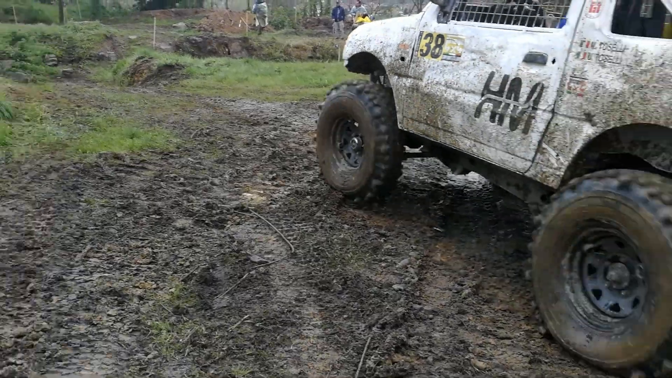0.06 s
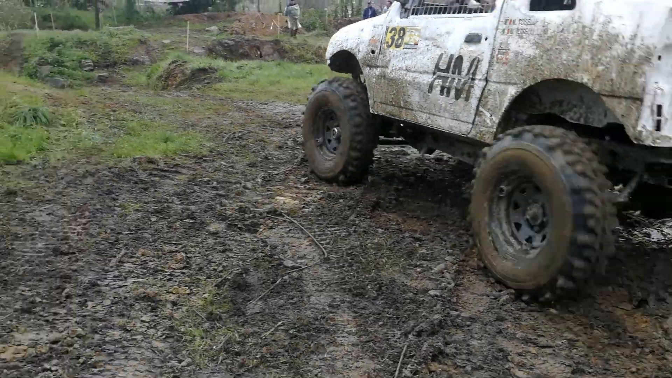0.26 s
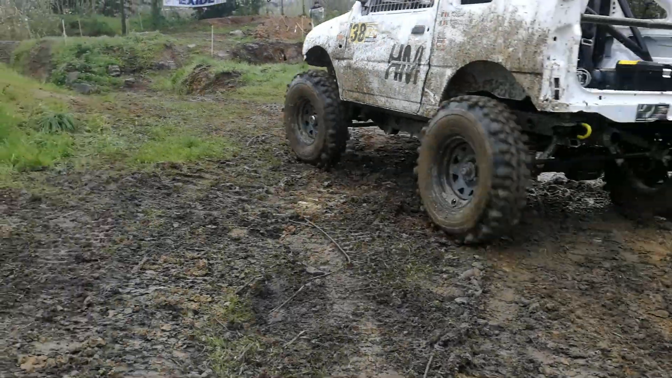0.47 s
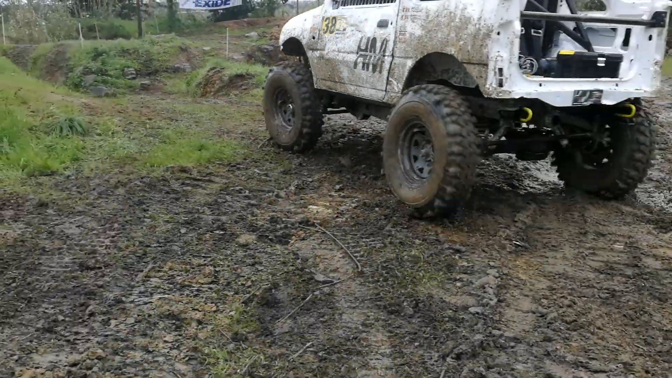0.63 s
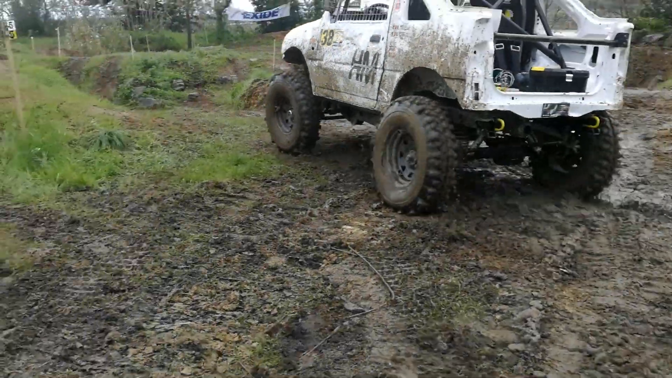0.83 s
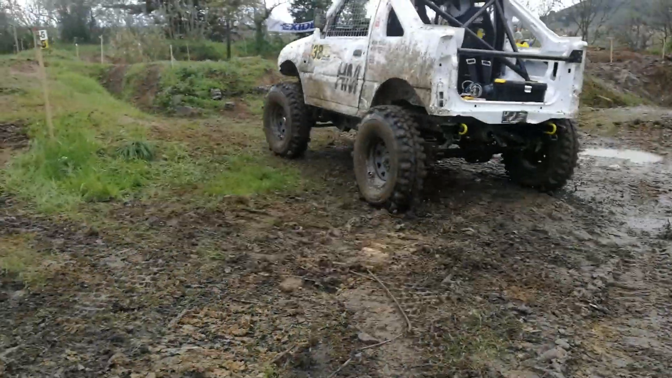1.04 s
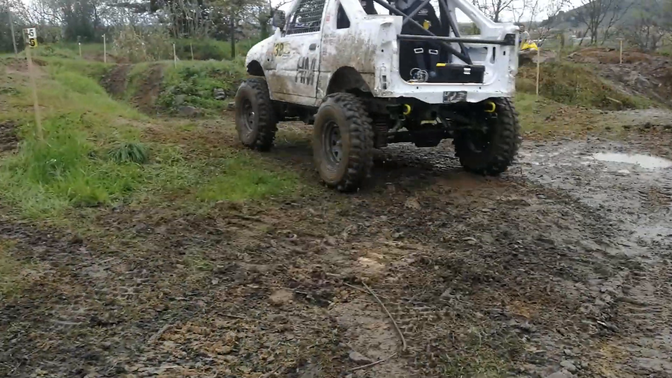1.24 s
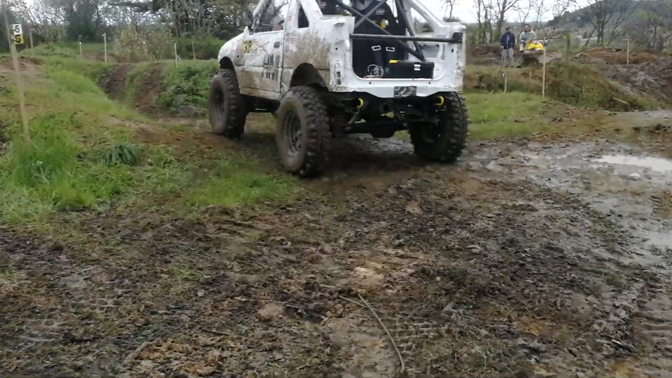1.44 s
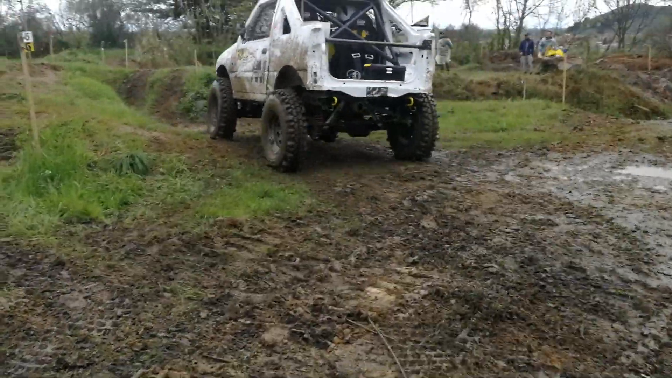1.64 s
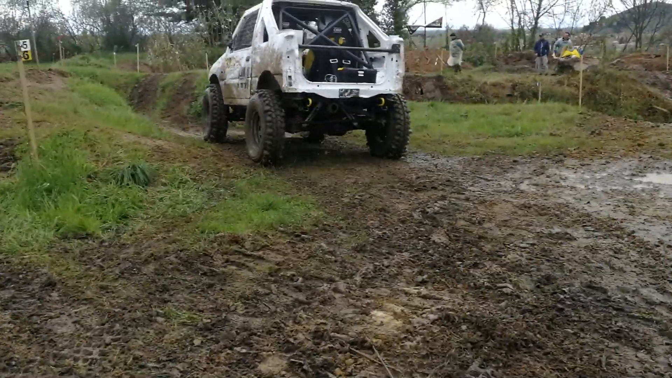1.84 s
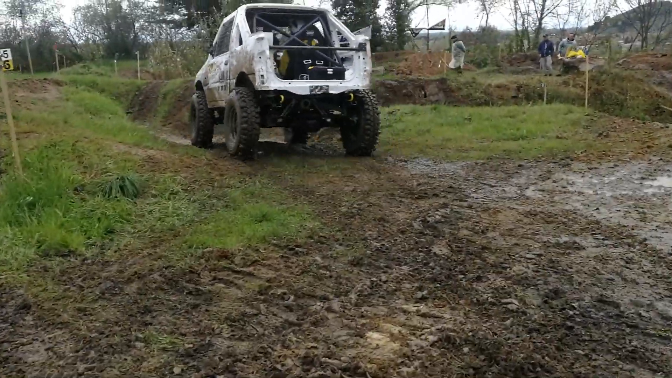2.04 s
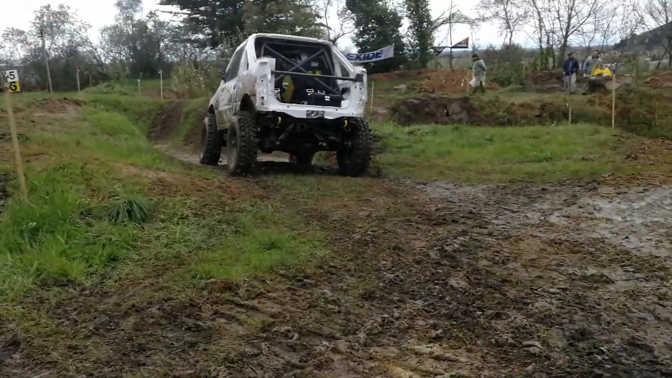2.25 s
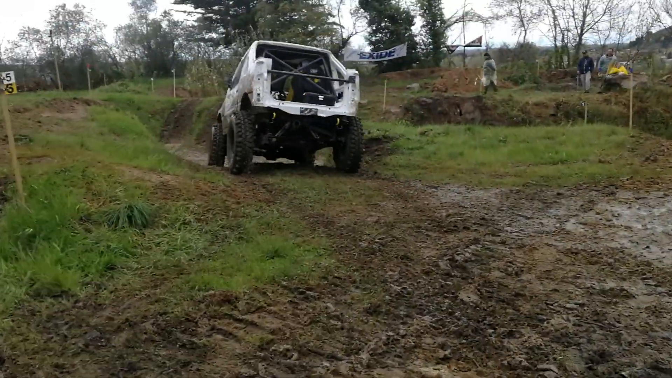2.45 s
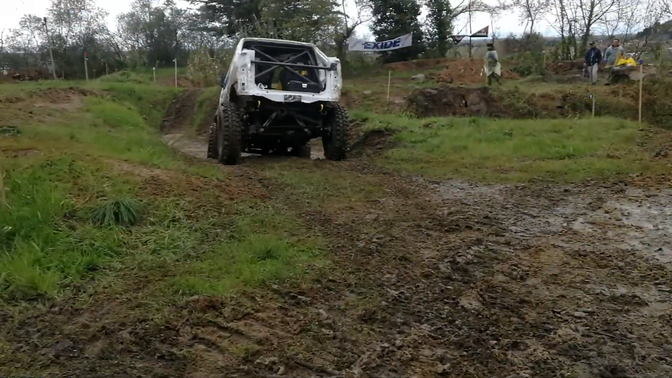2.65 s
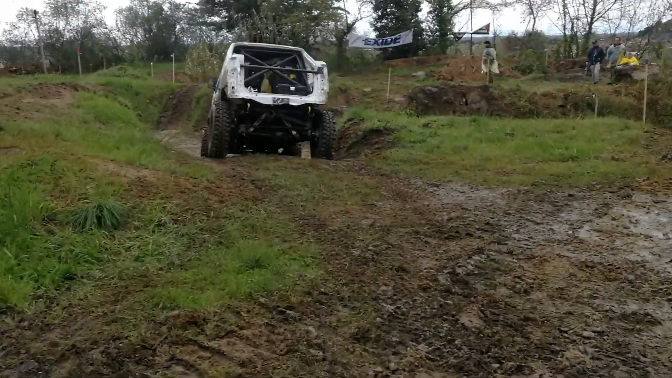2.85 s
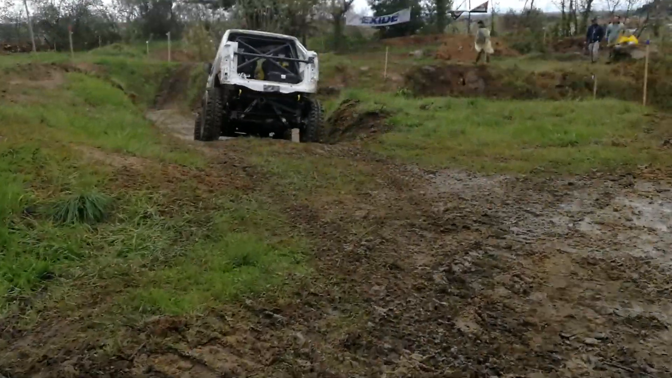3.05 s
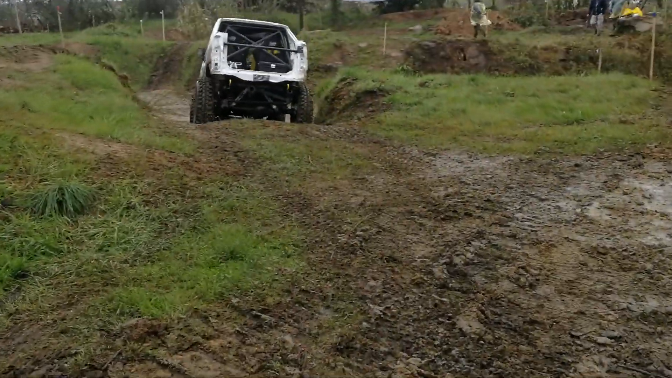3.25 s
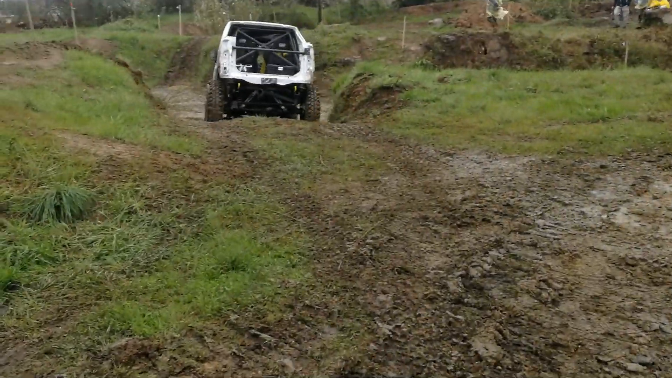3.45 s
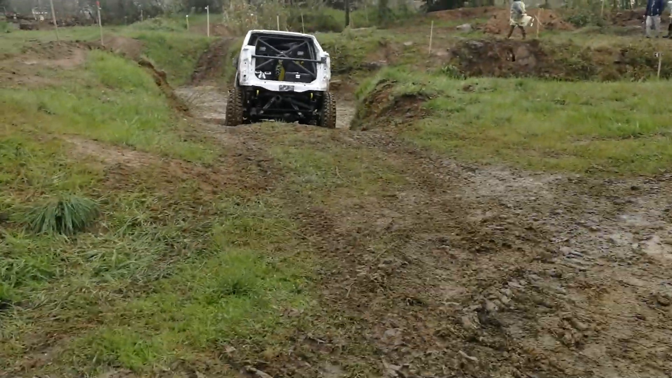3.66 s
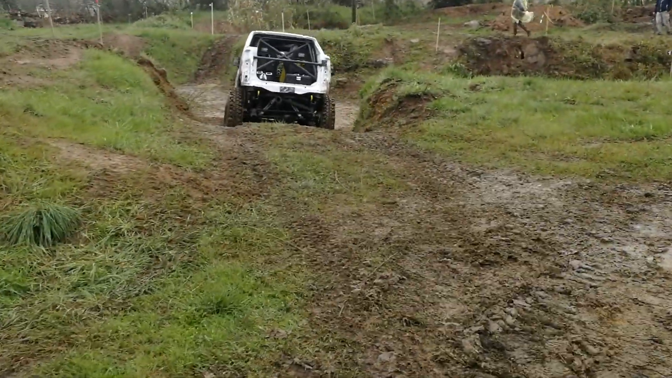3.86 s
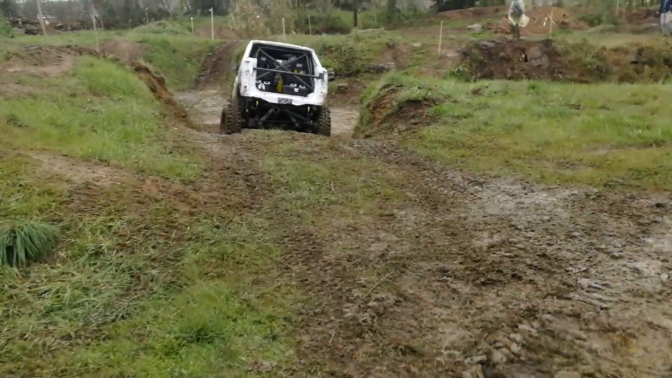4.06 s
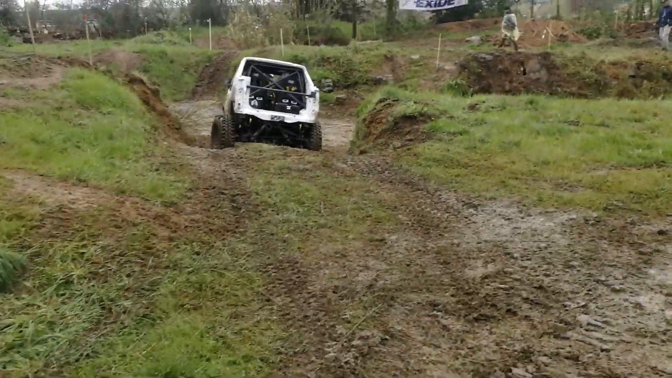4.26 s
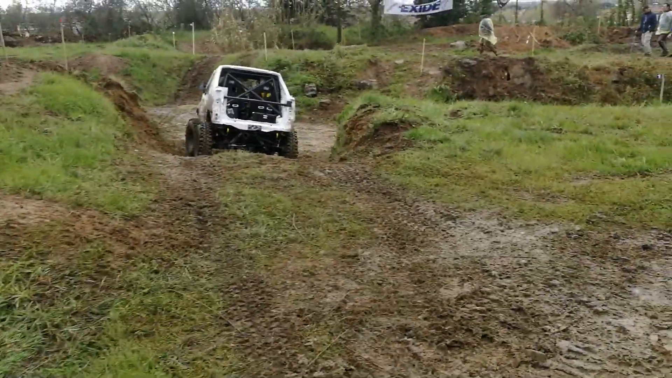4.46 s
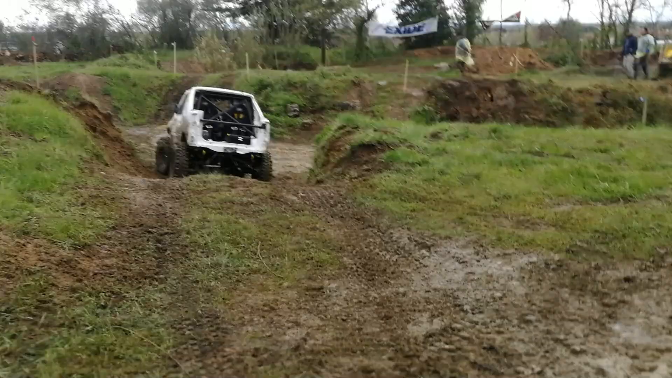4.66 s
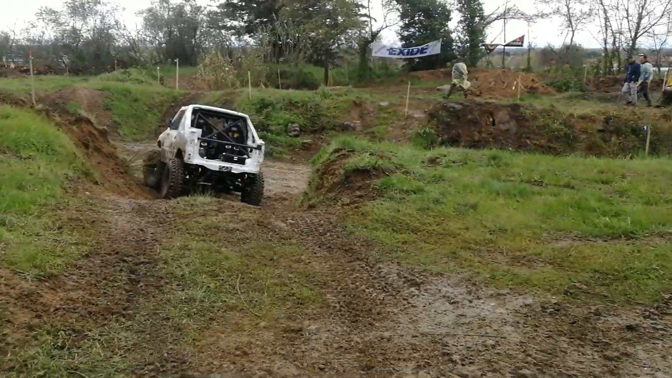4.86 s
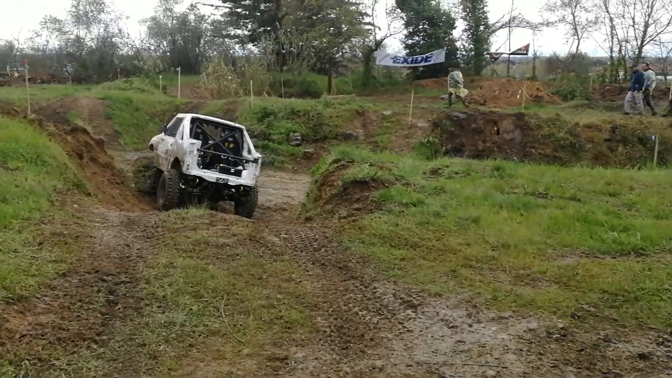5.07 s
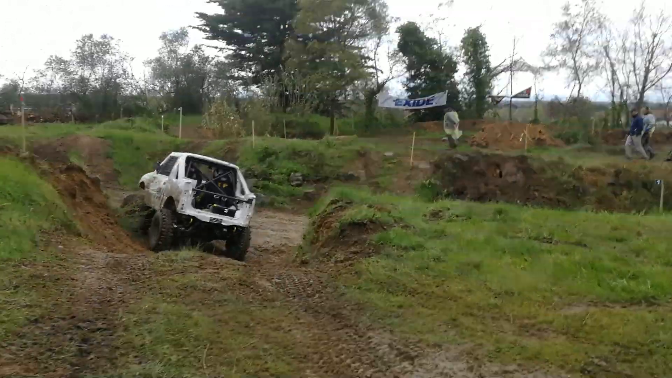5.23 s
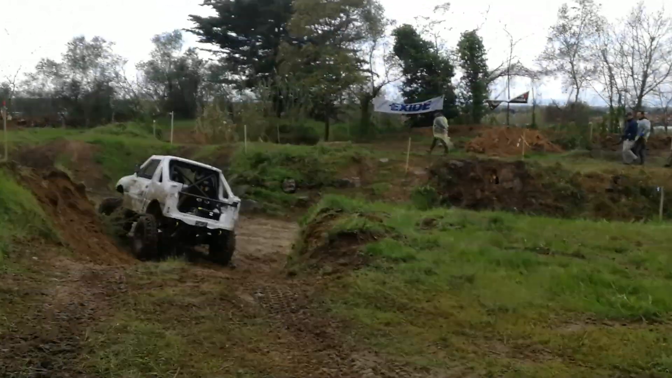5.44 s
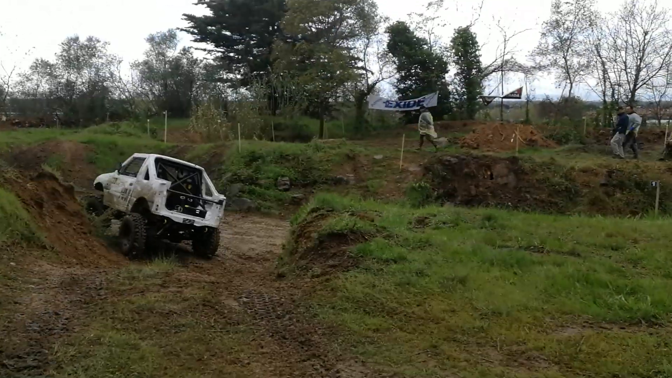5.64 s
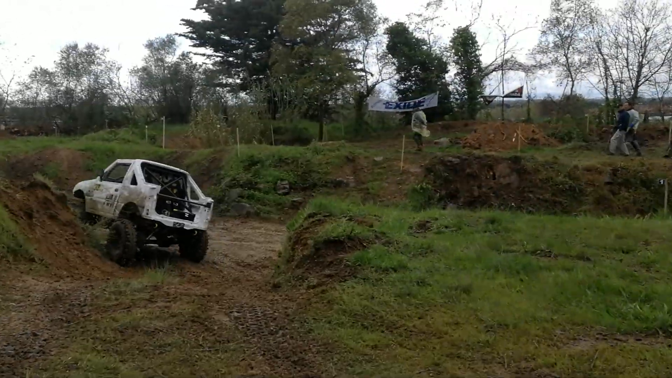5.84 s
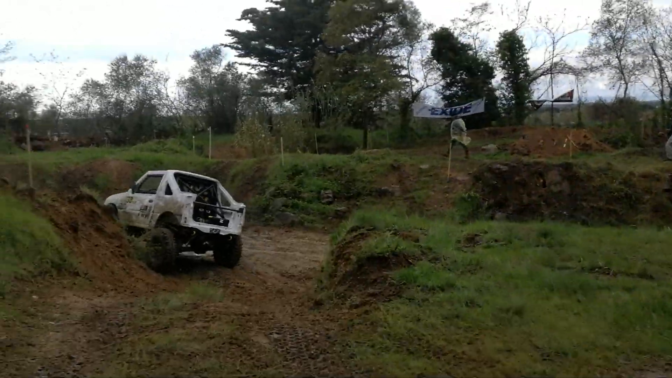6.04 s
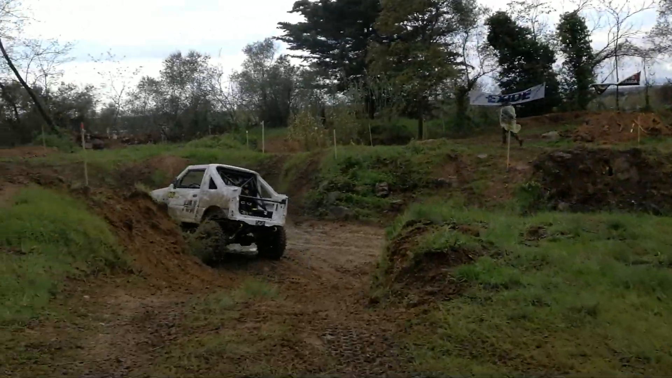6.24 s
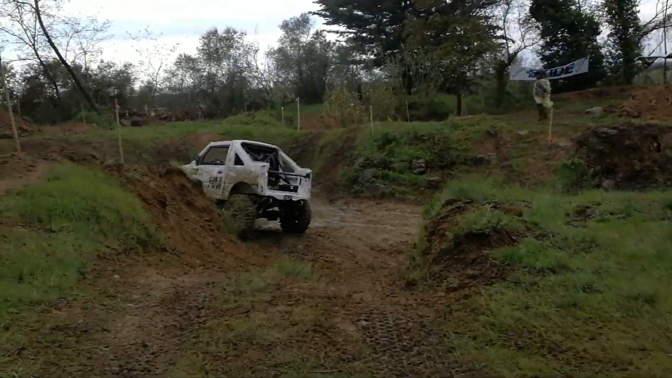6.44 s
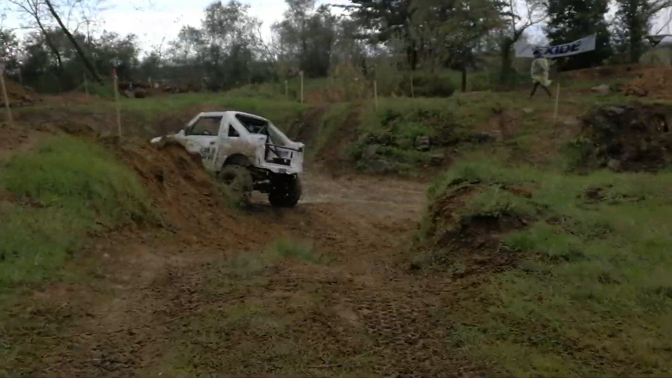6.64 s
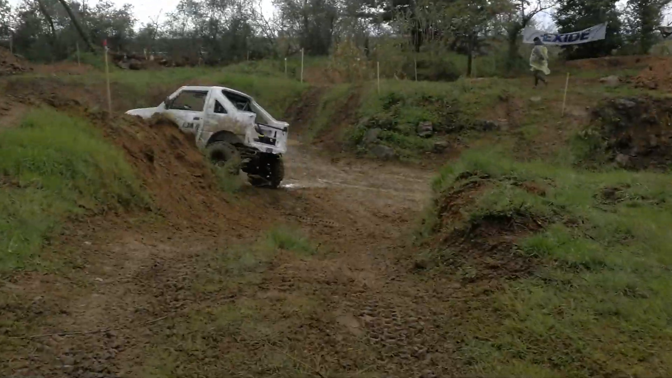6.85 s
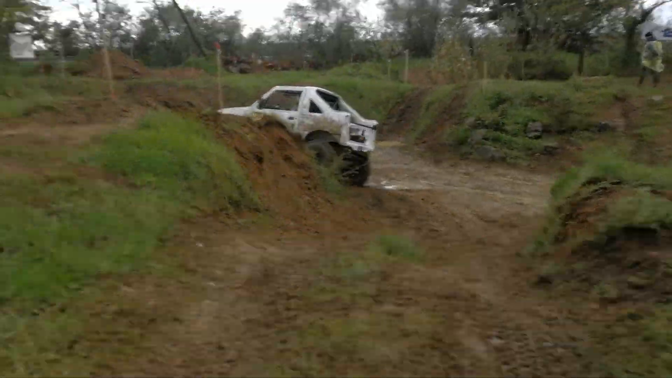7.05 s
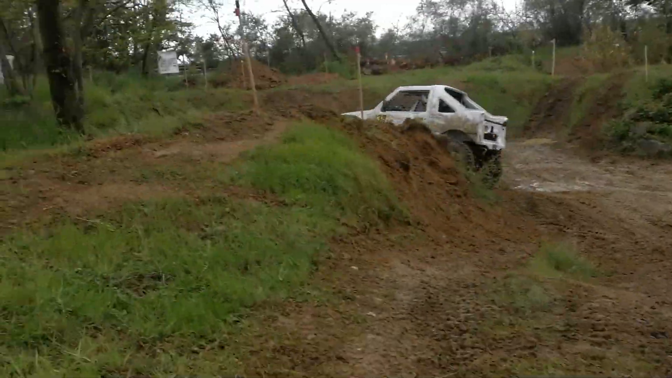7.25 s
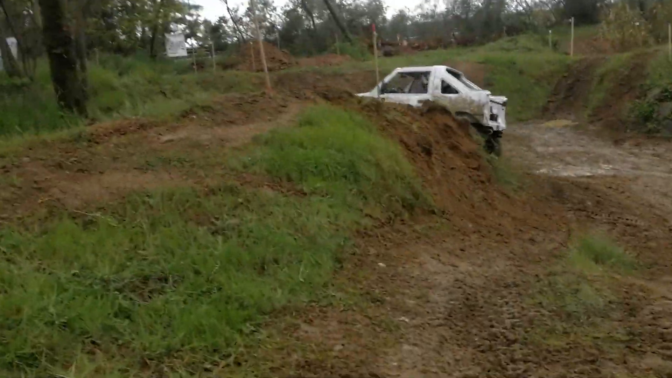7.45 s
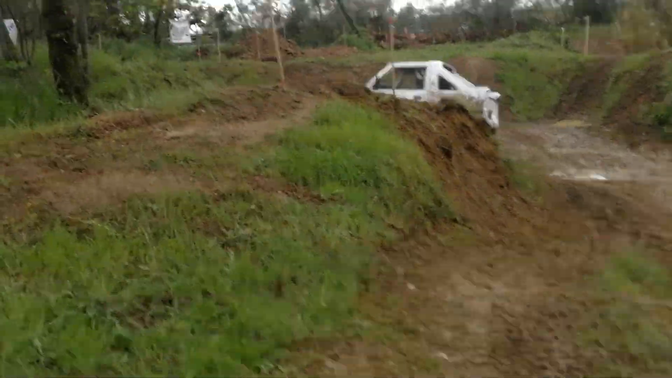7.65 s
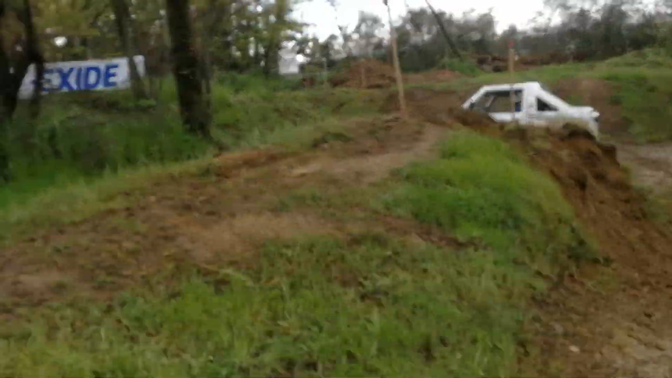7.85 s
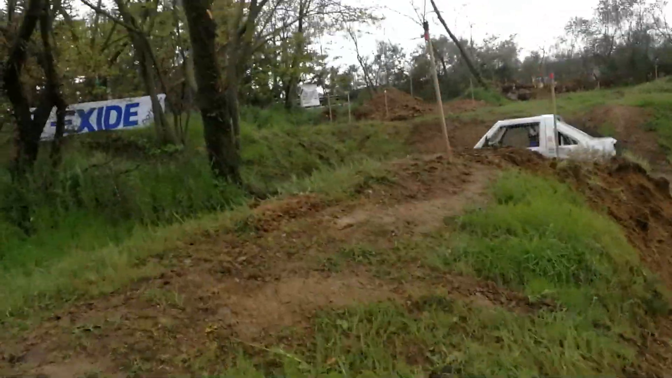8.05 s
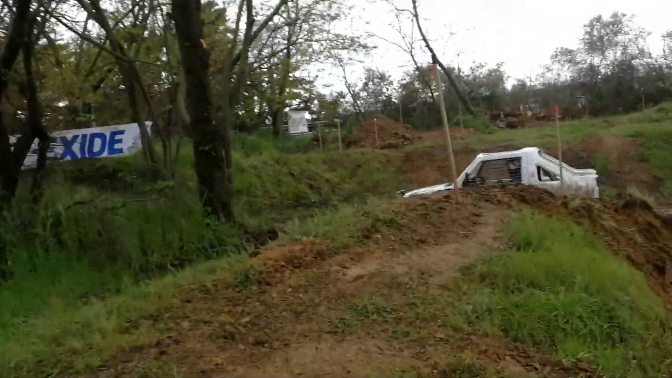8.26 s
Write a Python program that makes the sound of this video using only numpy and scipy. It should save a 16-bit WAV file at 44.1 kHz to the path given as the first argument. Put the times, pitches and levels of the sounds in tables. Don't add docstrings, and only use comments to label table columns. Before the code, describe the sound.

Raw exhaust growl of a muddy off-roader pulling away outdoors, sharp backfires on lift-off, low lugging, then a hard rasping burst sinking toward idle.

```python
import sys
import numpy as np
from scipy import signal
from scipy.fft import rfft, irfft, next_fast_len
from scipy.io import wavfile
from scipy.ndimage import uniform_filter1d, map_coordinates

SR = 44100
rng = np.random.default_rng(int(sys.argv[2]) if len(sys.argv) > 2 else 0)


def field_ratio(decibels):
    return 10 ** (np.asarray(decibels, dtype=float) / 20)


def unload_audio(sound):
    columns = np.transpose(np.atleast_2d(sound))
    steps = np.round(np.clip(columns, -1, 1) * 32767)
    wavfile.write(sys.argv[1], SR, steps.astype(np.int16))


N = 366030
STEP = 64


def unit(x):
    return x / np.sqrt(np.mean(x ** 2) + 1e-20)


def along(points, hz):
    f, v = np.transpose(points)
    return np.interp(np.log(hz + 1), np.log(f + 1), v)


def curves(rows):
    s, *cols = np.transpose(rows)
    return [np.interp(np.arange(N) / SR, s, c) for c in cols]


def fine(x):
    return np.interp(np.arange(N), np.arange(len(x)) * STEP, x)


def wobble(rate):
    knots = rng.standard_normal(int(N * rate / SR) + 4)
    return map_coordinates(knots, [np.arange(N) * rate / SR])


def filtered(x, response):
    m = next_fast_len(x.shape[-1] + 8192)
    spectrum = rfft(x, m) * response(np.fft.rfftfreq(m, 1 / SR))
    return irfft(spectrum, m)[..., :x.shape[-1]]


def below(hz, top_hz):
    return 1 / (1 + (hz / top_hz) ** 10)


def bell(hz, centre_hz, width_hz, power):
    return 1 / (1 + (2 * (hz - centre_hz) / width_hz) ** power)


# pitch_hz, likeness (0-1)
AIR_LIKENESS = [(200, 0.97), (640, 0), (1400, 0), (3000, 0.035), (8000, 0)]


def rush(spectrum, patchy_db, alike=AIR_LIKENESS):
    z = signal.stft(rng.standard_normal((2, N)), nperseg=512)[2]
    patches = uniform_filter1d(rng.standard_normal(z.shape[1:]), size=8, axis=0)
    patches = unit(uniform_filter1d(patches, size=10, axis=1))
    pair = signal.istft(z * field_ratio(patchy_db * patches), nperseg=512)[1][:, :N]

    def mid_side(hz):
        turn = np.arccos(np.clip(along(alike, hz), -1, 1)) / 2
        return field_ratio(along(spectrum, hz)) * [np.cos(turn), np.sin(turn)]

    mid, side = filtered(pair, mid_side)
    return unit(np.array([mid + side, mid - side]))


def add(track, sound, s, pan_db):
    part = track[:, round(s * SR):][:, :sound.shape[-1]]
    part += (sound * field_ratio([[pan_db / 2], [-pan_db / 2]]))[:, :part.shape[1]]


# pitch_hz, level_db (per Hz)
RUMBLE_COLOUR = [(12, -48), (20, -27.5), (101, 10.5), (155, -12.5), (212, 5.5), (349, 9.5), (433, -37),
                 (600, -16), (780, -49), (1320, -120)]
# time_s, level_db
RUMBLE_LEVEL = [(0, -43), (3.7, -40.5), (7.6, -44), (8.0, -47), (8.3, -52)]


def distant_engines():
    level_db = curves(RUMBLE_LEVEL)[0] + 1.5 * wobble(3.48)
    return field_ratio(level_db) * rush(RUMBLE_COLOUR, patchy_db=3)


# pitch_hz, level_db (per Hz)
FIELD_COLOUR = [(240, -47.5), (400, 4.5), (479, -12.5), (549, -10.5), (821, -9.5), (1450, -17.5),
                (1650, -16.5), (2100, -14.5), (5000, -24.5), (6500, -63), (11000, -120)]
# time_s, level_db
FIELD_LEVEL = [(3.6, -47), (4.5, -46.5), (5.1, -45), (5.9, -49), (7.2, -43.5)]


def open_field():
    level_db = curves(FIELD_LEVEL)[0] + 0.43 * wobble(1.3)
    return field_ratio(level_db) * rush(FIELD_COLOUR, patchy_db=3.0)


# time_s, gain_db
GUST_SWELL = [(6.1, 1), (7.2, -2), (7.55, 4.5), (7.9, 1.5), (8.05, 2.5)]


def gust():
    rise = np.clip((np.arange(N) / SR - 6.1) / .15, 0, 1)
    level_db = -41 + curves(GUST_SWELL)[0] + 2.5 * wobble(5.3)
    colour = [(15, -16), (35, 4.5), (70, -9), (120, -3), (200, -57.5)]
    return rise * field_ratio(level_db) * rush(colour, patchy_db=2.0)


# pitch_hz, level_db (per Hz)
GRASS_COLOUR = [(530, -31), (900, -16.5), (1370, -3), (1720, -5.5), (4860, -9), (7770, -6.5),
                (16000, -23.5)]
# start_s, length_s, level_db
RUSTLES = [(2.606, 0.33, -43), (3.1, 0.037, -70), (4.094, 0.054, -51), (4.171, 0.1, -53.5),
           (4.8, 0.089, -46.5), (5.828, 0.076, -45.5), (6.91, 0.17, -48.5), (7.125, 0.074, -48.5),
           (7.191, 0.14, -43.5), (7.3, 0.38, -55.5), (7.538, 0.16, -44.5), (7.636, 0.17, -46),
           (7.868, 0.23, -45.5)]


def rustles():
    track = np.zeros((2, N))
    brushing = rush(GRASS_COLOUR, patchy_db=1.5) * field_ratio(3.0 * wobble(150))
    for s, length, db in RUSTLES:
        swell = np.hanning(round(length * SR))
        add(track, field_ratio(db) * swell * brushing[:, round(s * SR):][:, :len(swell)], s, -2)
    return track


# start_s, level_db (peak), pitch_hz, pan_db (left over right)
CHIRPS = [(2.473, -33.5, 12000, -6), (2.5373, -37.5, 12900, -4), (5.929, -51, 12500, -11),
          (5.995, -56.5, 12500, -20), (6.974, -38, 12200, -3), (7.028, -42, 12600, -15),
          (7.23, -60, 12700, -17), (7.6779, -49.5, 12700, -11.5), (7.758, -46, 13700, -10),
          (7.893, -42, 12500, 2), (8.279, -58, 12100, 25.5)]


def chirps():
    track, t = np.zeros((2, N)), np.arange(SR // 10) / SR
    for s, db, peak_hz, pan_db in CHIRPS:
        def wing(hz):
            upper = .4 * bell(hz, 1.21 * peak_hz, 500, 2)
            return bell(hz, peak_hz, 500, 2) + upper + .1 * (hz > peak_hz)
        noise = rng.standard_normal((2, len(t)))
        add(track, field_ratio(db - 5.0 - 60 * t / .05) * unit(filtered(noise, wing)), s, pan_db)
    return track


# start_s, level_db (peak), pitch_hz, pan_db (left over right)
KNOCKS = [
    (1.67, -18.5, 925, 4),
    (3.0533, -15.5, 3100, 2.5),
    (3.454, -26.5, 3500, 10),
    (4.889, -36.5, 1000, 9),
    (7.598, -39, 1051, 0),
    (7.696, -38, 900, 4),
    (8.004, -29.5, 1350, 5),
    (8.003, -33, 2095, 4),
    (8.0522, -36, 1240, 7),
]
# start_s, level_db (peak), pitch_hz, pan_db (left over right)
TICKS = [
    (1.504, -34, 3235, -3),
    (4.339, -39, 4660, -6),
    (4.834, -35, 5360, 0),
    (5.791, -45, 6990, -6),
    (8.0015, -42, 5960, 5),
    (8.215, -36.5, 5710, -1),
    (8.2533, -31, 4840, -1),
]


def knocks_and_ticks():
    track, t = np.zeros((2, N)), np.arange(SR // 10) / SR
    snap = (field_ratio(-60 * t / .02) + field_ratio(-14 - 60 * t / .12)) * (1 - np.exp(-t / .0006))
    for s, db, peak_hz, pan_db in KNOCKS + TICKS:
        noise = rng.standard_normal((2, len(t)))
        body = filtered(noise, lambda hz: bell(hz, peak_hz, .6 * peak_hz, 4))
        add(track, field_ratio(db) * snap * unit(body), s, pan_db)
    return track


# start_s, end_s, pitch_hz, level_db
SQUEALS = [
    (2.02, 2.18, 3320, -48),
    (3.14, 3.25, 3290, -50),
    (3.24, 3.33, 3280, -54),
    (3.33, 3.44, 3280, -62),
    (3.5, 3.75, 3280, -62),
    (4.32, 4.39, 2300, -48),
]


def brake_squeal():
    track = np.zeros((2, N))
    for start, end, hz, db in SQUEALS:
        u = np.arange(round((end - start) * SR)) / SR
        waver = 1.2 * wobble(38.0)[:len(u)]
        tone = np.sin(2 * np.pi * hz * u + waver)
        add(track, field_ratio(db + waver) * np.hanning(len(u)) ** .5 * tone, start, 2)
    return track


# pitch_hz, level_db (per Hz)
INTAKE_COLOUR = [(1900, -35), (2600, -5), (2950, -8), (3300, 1), (3700, -6), (4100, 1), (4700, -2),
                 (5600, -7), (7000, -13), (9000, -38)]
# start_s, level_db (peak)
PINGS = [(6.2992, -29), (6.3476, -22.5), (6.3722, -21), (6.4206, -29), (6.4555, -25.5), (6.4668, -23),
         (6.5003, -22.5), (6.555, -25), (6.6579, -26), (6.6669, -28), (6.6967, -30.5), (6.748, -28)]


def engine_bay_pings():
    track, t = np.zeros((2, N)), np.arange(SR // 10) / SR
    for s, db in PINGS:
        noise = rng.standard_normal((2, len(t)))
        ping = unit(filtered(noise, lambda hz: field_ratio(along(INTAKE_COLOUR, hz))))
        add(track, field_ratio(db - 60 * t / 0.0096) * ping, s, 0)
    return track


def bark(t, hz, tail_db):
    def pipe(f):
        return (1j * f * 650 / (hz ** 2 - f ** 2 + 1j * f * 650)) ** 2
    ring = field_ratio(-60 * t / .02) * np.sin(2 * np.pi * hz * t)
    tail = unit(filtered(rng.standard_normal(len(t)), pipe))
    return 0.9 * ring + field_ratio(tail_db - 60 * t / 0.089) * tail


# pitch_hz, level_db (per Hz)
CRACK_COLOUR = [(880, -22), (1500, -3.5), (2990, -8), (5220, -8), (7630, -11), (9700, -17), (10200, -19.5),
                (13000, -21.5), (16300, -35.5)]
# start_s, crack_db (peak), bark_db, thump_db, pan_db (left over right)
BANGS = [
    (1.87, -1, -2.5, -3.5, -6),
    (1.9762, -2, -5.5, 0.5, -0.5),
    (2.2189, -1, -8, -0.5, -0.5),
    (2.2834, -8, -11, 1.5, -2),
    (2.4665, -18, -4, -3.5, -7),
    (2.552, -4, -10.5, -11, -6.5),
    (3.054, -3, -10, -3, -7),
    (3.4556, -12.5, 5.5, 3, -9.5),
]


def backfires():
    track, t = np.zeros((2, N)), np.arange(SR // 5) / SR
    ground_echo = np.roll(field_ratio(-32.0 - 60 * t / 0.0098), 75)
    tail = field_ratio(-13.0 - 60 * t / 0.056) + field_ratio(-42.5 - 60 * t / 2.3)
    burst = field_ratio(-60 * t / 0.0035) + ground_echo + tail
    for s, db, bark_db, thump_db, pan_db in BANGS:
        bark_hz = 1092 if s < 2.4 else 760
        noise = rng.standard_normal((3, len(t)))
        blast = noise[:2] + 0.84 * noise[2]
        crack = burst * unit(filtered(blast, lambda hz: field_ratio(along(CRACK_COLOUR, hz))))
        thump = field_ratio(thump_db - 60 * t / 0.031) * np.sin(2 * np.pi * 210 * t + 0.35)
        add(track, field_ratio(db - 8.5) * crack, s + 0.00101, pan_db)
        add(track, field_ratio(db) * (field_ratio(bark_db - 7.5) * bark(t, bark_hz, tail_db=-9.0) + thump), s + 0.00049, 0)
    return track


# start_s, level_db (peak), pitch_hz, bark_db, bark_hz
POPS = [(1.581, -9, 201, -12.5, 750), (1.641, -4, 243, -21, 816), (1.699, -10.5, 242, -17, 822.5),
        (1.736, -10.5, 244, -19.5, 820), (3.192, -31, 211, -10, 760), (3.204, -21, 209.6, -7.5, 792),
        (3.246, -30, 152, -8, 765), (3.26, -29, 152, -4, 772), (3.566, -13.5, 183, -26, 606),
        (3.638, -19, 201, -30, 595), (4.888, -12, 179, -19, 676), (4.906, -7, 177, -15, 684),
        (4.921, -10.5, 183, -14, 666), (4.936, -9.5, 185, -12.5, 686), (7.568, -36, 300, -9, 484),
        (7.803, -32.5, 408, 2.5, 1033), (7.856, -27, 262.6, -10, 706), (7.919, -41, 417, -2, 700),
        (7.948, -35, 432, 3, 644), (7.981, -34, 430, 4.5, 727), (8.097, -36, 410, 3, 789)]


def pipe_pops():
    track, t = np.zeros((2, N)), np.arange(SR // 5) / SR
    for s, db, hz, bark_db, bark_hz in POPS:
        push = field_ratio(-60 * t / 0.076) * np.sin(2 * np.pi * hz * t) * (1 - np.exp(-t / 0.00047))
        add(track, field_ratio(db) * (push + field_ratio(bark_db + 1.0) * bark(t, bark_hz, tail_db=-13.0)), s, 0)
    return track


# time_s, firings_hz
SPEED = [(0, 109.5), (.2, 110.4), (.36, 112.2), (.52, 111.1), (.58, 112.7), (.66, 111.1), (.76, 110.5),
         (.85, 111.3), (1.2, 112), (1.42, 109.9), (1.55, 111.7), (1.63, 102.7), (1.8, 96.62), (2.03, 90),
         (2.4, 88.9), (2.5, 80.5), (2.61, 75.5), (3.03, 75.06), (3.14, 71.8), (3.55, 70.62), (3.72, 71.9),
         (4.6, 72.76), (4.69, 63.5), (4.85, 58.6), (4.95, 73.94), (5.36, 74.75), (5.46, 75.9), (5.7, 75.6),
         (5.85, 74.2), (6.08, 74.85), (6.22, 77.46), (6.7, 75.2), (7.1, 75.86), (7.25, 75.9), (7.4, 74),
         (7.6, 72.7), (7.75, 65), (7.9, 52.2), (8.3, 52.06)]
# time_s, level_db
EXHAUST_LEVEL = [(0, -11), (1.5, -14.5), (1.6, -19.5), (2.55, -19.5), (3.03, -23), (3.35, -22.5),
                 (3.62, -31.5), (4.6, -29.5), (4.68, -22), (4.875, -38.5), (4.895, -26.5), (5.7, -20),
                 (6.3, -18), (6.55, -17), (7.1, -17), (7.55, -19), (7.7, -29), (8.0, -36.5), (8.15, -40.5),
                 (8.3, -38.5)]
# peak_s, rise_s, fall_s, extra_firings_hz, extra_level_db
BLIPS = [
    (0.0, 0.098, 0.29, 11.5, 2),
    (0.681, 0.37, 0.35, 11.5, 5.5),
    (1.441, .38, .17, 11, 4),
    (4.102, 0.44, 0.48, 6.5, 8.5),
    (5.292, .36, .42, 15.5, 5.5),
    (6.76, 0.57, 0.71, 27, 2),
    (8.3, .14, .2, 5, 4.5),
]
# time_s, loss_db, recovery_s
STUMBLES = [(1.558, 19.5, 0.0086), (1.615, -2.5, 0.01), (1.655, 7.5, 0.01), (1.886, 14, 0.016),
            (1.992, 10.5, 0.012), (2.235, 2.5, 0.019), (2.3, 6, .015), (2.581, 7.5, 0.08), (2.695, 5, .02),
            (4.585, 2.5, .015), (4.775, 5, 0.011), (3.074, 10, 0.21), (3.47, 7, 0.037), (7.299, 6, 0.094)]
# start_s, end_s, scatter_db (between firings)
OVERRUNS = [
    (1.56, 1.82, 5),
    (1.82, 2.6, 2.6),
    (2.6, 2.73, 2.2),
    (2.73, 3.05, .9),
    (3.05, 3.47, 2),
    (3.47, 3.85, 4),
    (4.35, 4.92, 2.6),
    (7.65, 7.97, 3.5),
    (7.97, 8.3, 1.3),
]


def driving():
    t = np.arange(N) / SR
    hz, level_db = curves(SPEED)[0], curves(EXHAUST_LEVEL)[0]

    def swell(u, rise, fall):
        return np.cos(np.pi / 2 * np.clip(np.where(u < 0, -u / rise, u / fall), 0, 1)) ** 2

    for s, rise, fall, extra_hz, extra_db in BLIPS:
        hz = hz + extra_hz * swell(t - s, rise, fall)
        level_db = level_db + extra_db * swell(t - s + 0.06, rise, fall)
    for s, loss_db, recovery in STUMBLES:
        level_db = level_db - loss_db * np.exp(-np.abs(t - s) / np.where(t > s, recovery, 0.014))
    steady_db = .8
    overrun, scatter_db = np.zeros(N), np.full(N, steady_db)
    for start, end, lifted_db in OVERRUNS:
        lifted = (t >= start) & (t < end)
        overrun = overrun + lifted
        scatter_db = scatter_db + lifted * (lifted_db - steady_db)
    return (uniform_filter1d(hz, size=2000), uniform_filter1d(level_db, size=700),
            uniform_filter1d(overrun, size=5000), uniform_filter1d(scatter_db, size=2500))


CYLINDERS = [.9, .3, .5, -1.7]
# firings_hz, uneven_db
UNEVEN = [(65, 2.5), (76, 2.6), (86, 1), (100, .8), (111, 2), (122, .9)]


def firings(hz, overrun, scatter_db):
    evened = 1 - .55 * overrun
    blurred = np.where(np.arange(N) < 7.0 * SR, 1, .7)
    uneven_db = along(UNEVEN, hz) * blurred * evened
    turns = np.cumsum(hz) / SR
    firing = turns.astype(int)
    luck = rng.standard_normal((2, firing[-1] + 1))[:, firing]
    cylinders = np.array(CYLINDERS)
    habit_db = uneven_db * cylinders[firing % len(cylinders)]
    strength = field_ratio(habit_db + scatter_db * luck[0])
    strength = uniform_filter1d(uniform_filter1d(strength, size=170), size=170)
    strength /= np.sqrt(np.abs(uniform_filter1d(strength ** 2, size=4000)))
    hurry = 0.0093 * uneven_db * cylinders[(firing - 1) % len(cylinders)]
    early = uniform_filter1d(.0075 * scatter_db * luck[1] + hurry, size=300)
    return turns, firing, uneven_db, strength, 2 * np.pi * (turns + early)


def gas_puffs(turns, firing, sharp):
    luck = rng.standard_normal(firing[-1] + 1)[firing]
    puff = uniform_filter1d(np.exp(-6.5 * (turns % 1)) * field_ratio(1.7 * luck), size=30)
    return sharp * unit(puff) + 1 - sharp


# pitch_hz, width_hz, level_db
PIPE = [(104, 26.4, 3.5), (149.1, 12, -2), (173.6, 38.2, 1.5), (235, 57, 1), (316.5, 51, -11.5),
        (344.4, 31, -15.5), (462, 41, -27), (60, 16, -22)]
# time_s, level_db (re the note)
WIDE_OPEN = [(6.25, -61.5), (6.42, -26.5), (6.62, -20.5), (6.76, -37), (6.9, -52)]
# time_s, gain_db
EDGE = [(0, 1.5), (.15, -17.5), (.55, -30.5), (.66, -5.5), (1.45, -4.5), (1.6, 6.5), (3, 4.5), (3.2, -10.5),
        (3.6, -5), (4.0, -18), (4.45, -9), (4.78, -23), (4.95, 3), (5.4, 1), (5.8, -4.5), (6.0, -5.5),
        (6.15, -8.5), (6.3, 8), (6.42, -1.5), (6.52, 1), (6.6, -1.5), (6.68, 5.5), (6.85, -4), (6.95, -23),
        (7.6, -55), (8.3, -33)]
# time_s, gain_db
BASS = [(0, -2.5), (2.4, -2), (2.65, 6.5), (3.4, 4.5), (3.7, -3.5), (4.3, -1.5), (5.55, 4), (5.75, -11.5),
        (6.08, -7.5), (6.3, -3), (6.6, 3), (7.2, -3), (7.6, -15), (7.9, -27), (8.1, -6), (8.3, -10)]
# time_s, pitch_hz, depth_db
NOTCH = [(0, 258, 12), (4.9, 256, 8), (5.1, 250, 5), (5.5, 250, 11), (6.36, 241, 13), (6.6, 250, 4),
         (7.15, 262, 10)]
# time_s, gain_db
BOOM = [(0, 0), (.3, -8), (.55, -4.5), (.8, -5.5), (1.1, -3.5), (1.5, -8.5), (1.9, -0.5), (2.3, 0.5),
        (2.62, -3.5), (3, -9), (3.5, -1.5), (3.9, -4), (4.4, -5.5), (4.92, 2), (5.3, -7), (5.7, -3.5),
        (6.3, 6), (6.45, -1.5), (6.6, -5.5), (7.1, -5.5), (7.5, -10)]


def order_levels(hz, level_db, overrun):
    wide_open_db, edge_db, bass_db = (curves(rows)[0][::STEP] for rows in (WIDE_OPEN, EDGE, BASS))
    notch_hz, notch_db = (c[::STEP] for c in curves(NOTCH))
    notch_db = notch_db * (1 - overrun[::STEP])
    resonances = PIPE + [(535, 270, wide_open_db)]
    orders_db = []
    for k in range(1, 8):
        f = k * hz[::STEP]
        pipe_db = 10 * np.log10(sum(field_ratio(2 * db) * bell(f, c, w, 2) ** 2 for c, w, db in resonances))
        trim_db = edge_db * (below(f, 444) - below(f, 299.6)) + bass_db * below(f, 179)
        trim_db = trim_db - notch_db * bell(f, notch_hz, 13, 2)
        orders_db.append(level_db + fine(pipe_db + trim_db))
    orders_db[0] = orders_db[0] + curves(BOOM)[0] + 9.5 * overrun
    return orders_db


def exhaust_note(orders_db, hz, strength, phase):
    note = 0
    for k, db in enumerate(orders_db, 1):
        f = k * hz
        lag = np.arctan2(f * 110, 220 ** 2 - f ** 2) - 2
        follows = min(k / 3.6, 1)
        note = note + field_ratio(db) * strength ** follows * np.cos(k * phase - lag)
    return np.sqrt(2) * note


def pipe_burble(orders_db, uneven_db, overrun, scatter_db):
    stir_db = 2.4 * uneven_db + 7.5 * overrun + 1.1 * scatter_db
    level_db = np.max(orders_db, axis=0) - 26 + stir_db
    return field_ratio(level_db) * rush([(40, -40), (210, 0), (400, -17), (900, -90)], patchy_db=1.5)


# pitch_hz, level_db (per Hz)
RASP_COLOUR = [(400, -4), (480, -6), (570, -14), (710, 0), (820, -2.5), (890, -3), (965, 4.5), (1100, 1.5),
               (1270, 1), (1750, -4.5), (1900, -3), (2900, -58.5)]
# pitch_hz, likeness (0-1)
RASP_LIKENESS = [(400, .8), (2000, .7)]
# time_s, ring_db, bite_db
TAILPIPE = [(0, 4, 0), (.15, 3.5, -6.5), (.36, 14.5, 8), (.55, 8.5, -1), (.85, -0.5, -9), (1.03, 8, -5),
            (1.3, 9, 0.5), (1.6, -3, -7), (1.8, 4.5, 4), (2.5, 0, -6), (2.8, 8, -2), (5.2, 10.5, 4),
            (6.2, 8, 3.5), (6.38, 2, 0.5), (6.53, 2, 6.5), (6.62, 13.5, 4), (6.84, 4, 10.5),
            (7.05, -7.5, -7)]


def tailpipe_rasp(hz, turns, firing, phase, strength, uneven_db, puff, sharp, clean):
    even = .4 * phase + .6 * 2 * np.pi * turns
    overtones = 0
    for k in range(4, 21):
        f = k * hz[::STEP]
        load_db = 4 * (.8 - sharp[::STEP]) * (k - 16)
        size = field_ratio(along(RASP_COLOUR, f) - load_db) * below(f, 1800)
        drift = field_ratio(1.1 * wobble(4)[::STEP])
        overtones = overtones + fine(size * drift) * np.cos(k * even - 0.1192 * k ** 2)
    torn = unit(puff * rush(RASP_COLOUR, patchy_db=1.2, alike=RASP_LIKENESS))
    rasp = clean * unit(overtones) * strength ** 1.2 + np.sqrt(1 - clean ** 2) * torn
    loudest = firing % len(CYLINDERS) == 0
    beat = field_ratio(uniform_filter1d(1.8 * 2 * (1 - clean) * uneven_db * loudest, size=200))
    ring_db, bite_db = curves(TAILPIPE)
    ring = filtered(rasp, lambda f: bell(f, 750, 260, 4))
    bite = filtered(rasp, lambda f: bell(f, 1467, 310, 4))
    return rasp + (field_ratio(ring_db) * beat - 1) * ring + (field_ratio(bite_db) - 1) * bite


# pitch_hz, level_db (per Hz)
BAY_COLOUR = [(1300, -43), (1900, 0.5), (2400, 4.5), (2900, -0.5), (4000, -68.5)]
# pitch_hz, likeness (0-1)
BAY_LIKENESS = [(2000, .6), (8000, .35)]
# time_s, gain_db
FACING = [(4.8, -2), (5.1, -10), (5.7, -8), (5.98, 2.5), (6.25, 3), (6.45, 3), (6.64, -1), (6.87, 5.5),
          (7.0, -13)]


def intake_roar(puff, bay_db, roar_db):
    level_db = -36.5 + 0.63 * roar_db + curves(FACING)[0]
    clatter = field_ratio(bay_db) * rush(BAY_COLOUR, patchy_db=2)
    air = rush(INTAKE_COLOUR, patchy_db=1, alike=BAY_LIKENESS)
    return field_ratio(level_db) * unit((puff + .5) * (air + clatter))


# pitch_hz, level_db (per Hz)
HISS_COLOUR = [(2650, -42), (4500, -32), (5400, -2.5), (7710, 1.5), (11700, -11.5), (15000, -17),
               (16300, -45)]


def tyre_and_bay_hiss(puff, roar_db):
    flutter = field_ratio(1.6 * wobble(22))
    hiss = unit((puff + 1.1) * flutter * rush(HISS_COLOUR, patchy_db=1.5, alike=BAY_LIKENESS))
    return field_ratio(-41.5 + 0.45 * roar_db) * hiss


# time_s, rasp_db
ROAR = [(0, -21.5), (.35, -35.5), (.58, -23), (.85, -26.5), (1.09, -32), (1.29, -27.5), (1.45, -28),
        (1.8, -39), (2.54, -39.5), (2.63, -47), (3.63, -54.5), (4.1, -57), (4.88, -58.5), (5.05, -53),
        (5.22, -47), (5.45, -44.5), (5.56, -66), (5.73, -57), (6.1, -53), (6.38, -35.5), (6.63, -25.5),
        (6.8, -33.5), (6.95, -54), (8.3, -53.5)]
# time_s, puff sharpness (0-1), bay_db (re the intake), clean rasp share (0-1)
LOAD = [(0, .55, -5, .65), (.4, .55, -5, .75), (.53, .55, -5, .92), (.7, .55, -5, .88), (.85, .55, -5, .78),
        (1.1, .55, -5, .78), (1.25, .55, -5, .93), (1.5, .55, -5, .85), (1.62, .5, -5, .3),
        (2.55, .3, -6, .4), (2.75, .3, -7, .88), (3.05, .3, -8, .85), (3.2, .3, -8, .6), (4.9, .4, -15, .6),
        (5.2, .62, -18, .8), (5.5, .55, -18, .75), (6.1, .5, -18, .6), (6.3, .85, -24, .75),
        (6.5, .78, -24, .975), (6.82, .72, -24, .95), (6.98, .4, -12, .3), (7.2, .3, -8, .1)]
# time_s, lag (samples by which left trails right)
BEARING = [(0, 12), (.7, 6), (1.7, 0), (2.3, 0), (2.8, -10), (4.2, -10), (4.7, -4), (5.2, -14), (6.8, -11),
           (7.2, 5), (8.3, 0)]


def engine():
    hz, level_db, overrun, scatter_db = driving()
    turns, firing, uneven_db, strength, phase = firings(hz, overrun, scatter_db)
    sharp, bay_db, clean = curves(LOAD)
    puff = gas_puffs(turns, firing, sharp)
    rasp_db = curves(ROAR)[0]
    roar_db = rasp_db + 26

    orders_db = order_levels(hz, level_db, overrun)
    note = exhaust_note(orders_db, hz, strength, phase)
    burble = pipe_burble(orders_db, uneven_db, overrun, scatter_db)
    rasp = tailpipe_rasp(hz, turns, firing, phase, strength, uneven_db, puff, sharp, clean)
    bay = intake_roar(puff, bay_db, roar_db) + tyre_and_bay_hiss(puff, roar_db)

    here, shift = np.arange(N), curves(BEARING)[0] / 2

    def lagged(x, share):
        left = np.interp(here - share * shift, here, x[0])
        return np.array([left, np.interp(here + share * shift, here, x[1])])

    return lagged(note + burble, 1.2) + lagged(field_ratio(rasp_db) * rasp, .45) + lagged(bay, 0.94)


def scene():
    background = distant_engines() + open_field() + gust()
    nearby = rustles() + chirps() + knocks_and_ticks()
    car = brake_squeal() + engine_bay_pings() + backfires() + pipe_pops() + engine()
    return background + nearby + car


def roll_off(x):
    return signal.sosfilt(signal.butter(12, 16450, fs=SR, output="sos"), x)


# pitch_hz, tilt_db (left over right)
PORT_TILT = [(400, 0), (700, -2), (1300, 0), (4400, -2.5), (8000, 0), (13000, -2)]


def record(dry):
    def ports(hz):
        tilt = field_ratio(along(PORT_TILT, hz) * [[.5], [-.5]])
        return tilt * (hz < 16450) / (1 + (55 / (hz + 1)) ** 3)
    heard = filtered(dry, ports)
    heard = heard / (1 + np.abs(heard) ** 6) ** (1 / 6)
    return roll_off(heard)


dry = scene()
out = record(dry)
unload_audio(out)
```